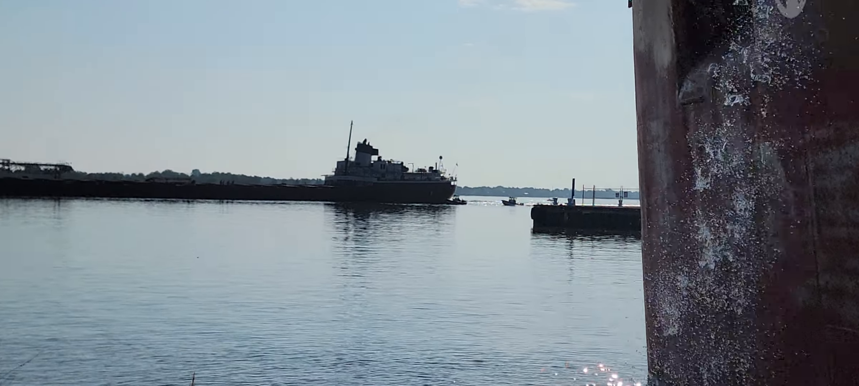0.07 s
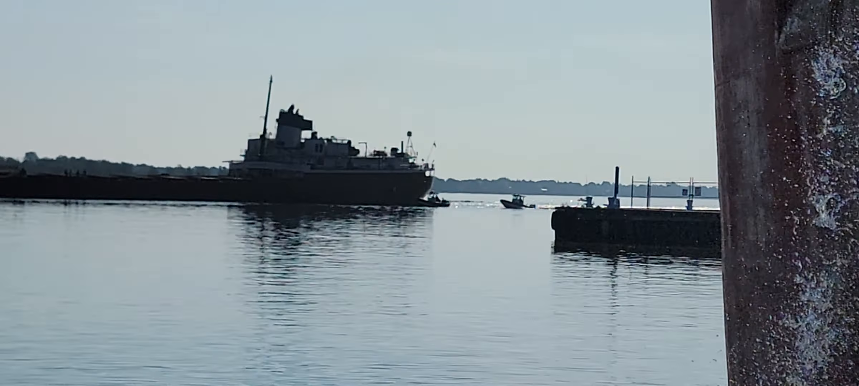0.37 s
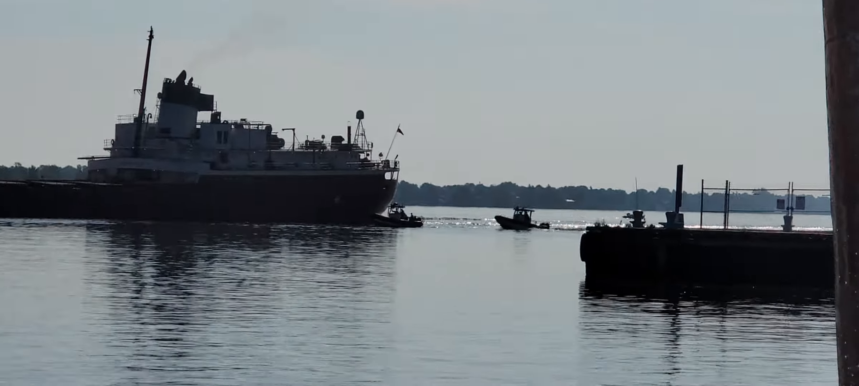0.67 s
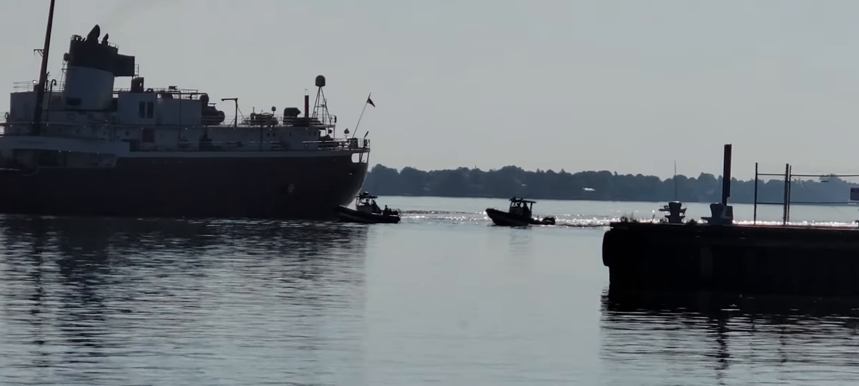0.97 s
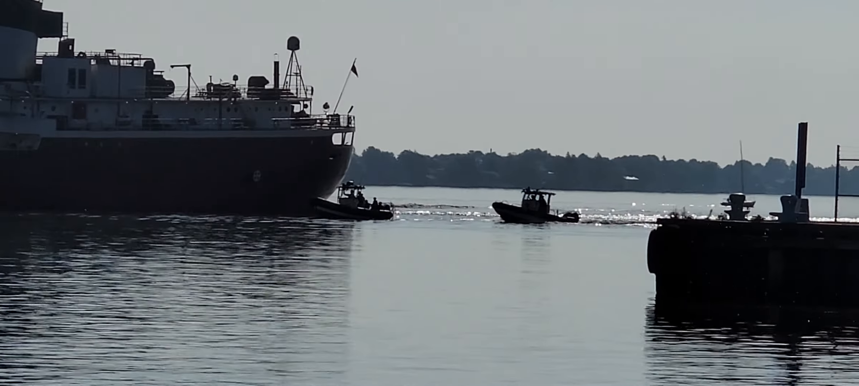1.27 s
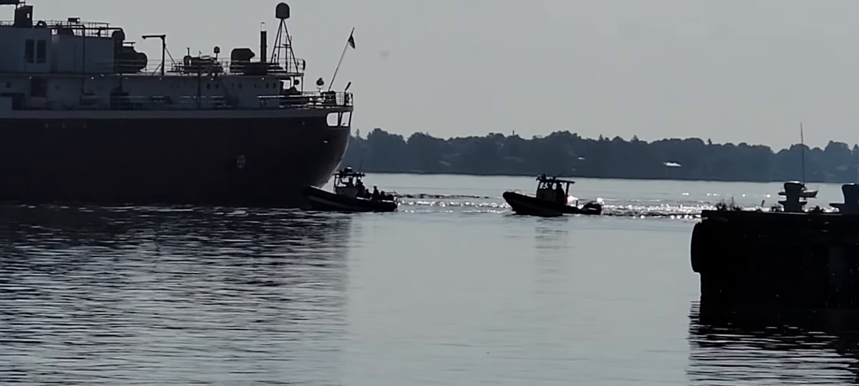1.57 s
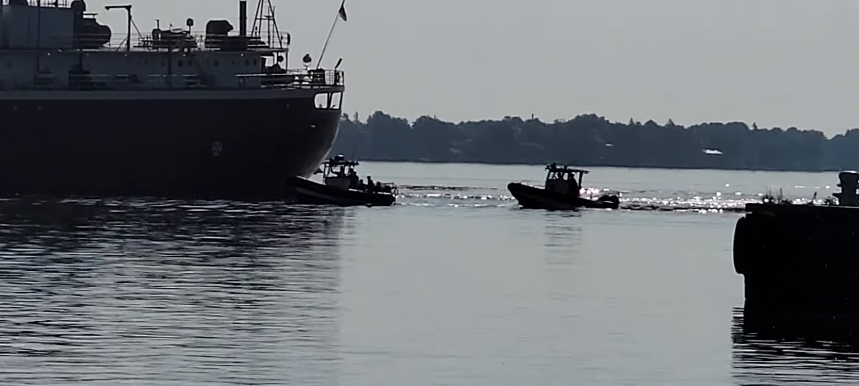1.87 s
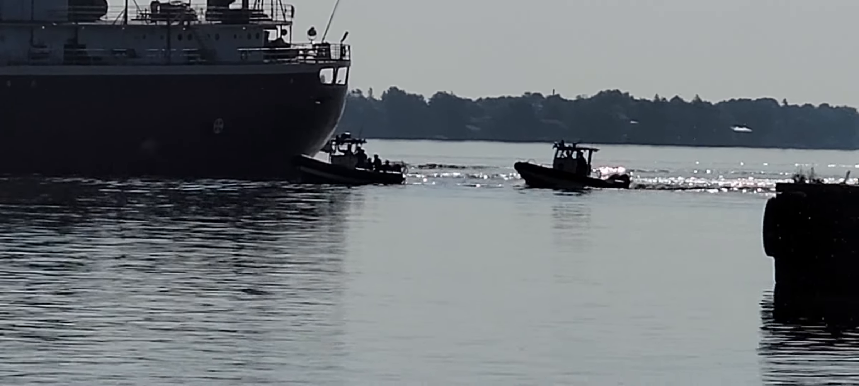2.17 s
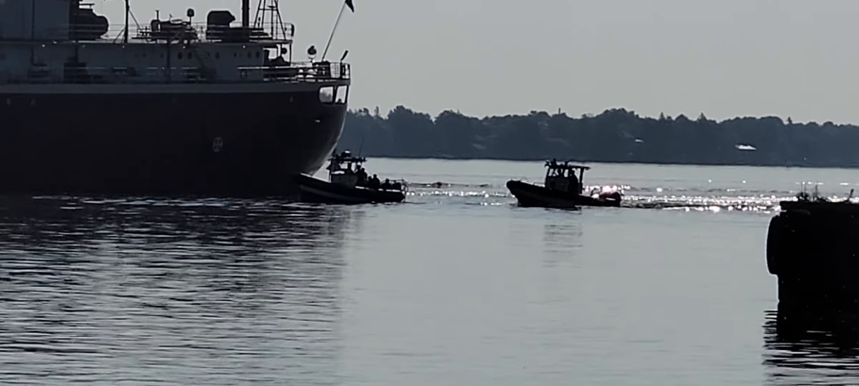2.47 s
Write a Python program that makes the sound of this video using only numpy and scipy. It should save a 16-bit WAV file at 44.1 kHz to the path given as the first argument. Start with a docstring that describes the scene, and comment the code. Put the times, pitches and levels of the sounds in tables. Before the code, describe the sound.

A distant freighter's engine drones and throbs beneath a steady wash of harbour water and a fine, surging hiss.

```python
"""A bright hiss, like fine spray, surges and flutters over the wash of churned harbour water.
Beneath it drones the diesel generator of a distant freighter: periodic firing gives a throbbing tone,
and pumps and fans add hums to a dull rumble. Water and spray are bands of noise that surge together.
The sound reaches two microphone ports a hand apart, of which the right rings in the high treble.
As the pair swings round, the hiss grows and changes colour."""
import sys
import numpy as np
from scipy import signal
from scipy.fft import rfft, irfft, next_fast_len
from scipy.io import wavfile
from scipy.ndimage import uniform_filter1d, map_coordinates

SR = 44100
rng = np.random.default_rng(int(sys.argv[2]) if len(sys.argv) > 2 else 0)


def unload_audio(sound):
    """Save the sound as a 16-bit wav file, at the path given as the first command line argument."""
    columns = np.transpose(np.atleast_2d(sound))
    # keep every value between -1 and 1, then stretch to whole-number steps
    steps = np.round(np.clip(columns, -1, 1) * 32767)
    wavfile.write(sys.argv[1], SR, steps.astype(np.int16))


N = 415422
TIME = np.arange(N) / SR


def amp(db):
    """Decibels as an amplitude ratio."""
    return 10 ** (np.asarray(db) / 20)


def unit(x):
    """Normalisation to rms 1."""
    return x / np.sqrt(np.mean(x ** 2) + 1e-20)


def along(rows, hz, column=1):
    """Interpolation of one column over log frequency."""
    table = np.transpose(rows)
    return np.interp(np.log(hz + 1), np.log(table[0] + 1), table[column])


def curve(rows, t=TIME):
    """Linear interpolation of (seconds, value) rows."""
    return np.interp(t, *np.transpose(rows))


def bell(x, centre, width):
    """A Gaussian of height 1 in time or frequency."""
    return np.exp(-((x - centre) / width) ** 2)


def wobble(rate):
    """Smooth random modulation, rate knots a second."""
    return map_coordinates(rng.standard_normal(int(N * rate / SR) + 4), [np.arange(N) * rate / SR])


def filtered(x, response):
    """Linear filtering: the spectrum times response(Hz)."""
    m = next_fast_len(N + SR // 2)
    return irfft(rfft(x, m) * response(np.fft.rfftfreq(m, 1 / SR)), m)[..., :N]


def above(hz, edge_hz, order):
    """Butterworth high-pass gain."""
    return 1 / np.sqrt(1 + (edge_hz / (hz + 1)) ** (2 * order))


def patchy(x, depth_db):
    """Random spectral modulation, in patches about 130 Hz wide and 70 ms long."""
    spectra = signal.stft(x, nperseg=1024)[2]
    field = rng.standard_normal(spectra.shape[1:])
    field = uniform_filter1d(uniform_filter1d(field, 3, axis=0), 6, axis=1)
    return signal.istft(spectra * amp(depth_db * unit(field)), nperseg=1024)[1][:, :N]


def port_noise(coherence):
    """Partial coherence: white noise at two ports, the sum and difference of independent noises."""
    def weights(hz):
        angle = np.arccos(np.clip(along(coherence, hz), 0, 1)) / 2
        return np.array([np.cos(angle), np.sin(angle)])
    mid, side = filtered(rng.standard_normal((2, N)), weights)
    return np.array([mid + side, mid - side])


# The turn of the microphones. Each row: time in seconds, share of a full swing from 0 to 1.
SWING = [(0, 0.06), (1.7, 0.14), (4.5, 0.49), (7.5, 0.86)]
def swing(t=TIME):
    """Orientation of the pair, as a share of a full swing."""
    return curve(SWING, t)


def swung(x, gain_db):
    """Time-varying filtering: the colour follows gain_db(Hz, share of the swing)."""
    hz, t, spectra = signal.stft(x, SR, nperseg=1024)
    return signal.istft(spectra * amp(gain_db(hz[:, None], swing(t))), SR, nperseg=1024)[1][..., :N]


# The path round the housing to the left port. Each row: frequency in Hz, extra phase lag in radians.
HOUSING_LAG = [(1700, -0.04), (2100, 1.8), (2450, 1.2), (2750, -1.1), (3100, -0.32), (3500, -1.2),
               (3700, -0.46), (4050, 0.43), (4450, -0.088), (5400, -1.08), (6200, -0.9), (6900, 0),
               (7500, -0.29), (9000, 0.23), (10600, 0.4), (12000, 0.88), (12700, -0.94), (15000, -0.5)]
def from_the_right(pair, base_lag_s):
    """Path difference: the left port hears later as the pair swings, and diffraction bends the phase."""
    lag = base_lag_s * SR * (1 + 0.08 * swing())
    left = map_coordinates(pair[0], [np.arange(N) - lag], order=5, mode="mirror")
    return np.array([filtered(left, lambda hz: np.exp(-1j * along(HOUSING_LAG, hz))), pair[1]])


def far_tone(hz, fade_db, drift_rad):
    """Fading: the air path makes a machine tone's level and phase wander."""
    phase = 2 * np.pi * (hz * TIME + rng.random()) + drift_rad * wobble(2.56)
    return np.sqrt(2) * np.sin(phase) * unit(amp(fade_db * wobble(3.03)))


def low_noise(response):
    """Filtered noise of long wavelength, largely coherent at the two ports."""
    coherence = [(25, 0.45), (70, 0.79), (200, 1.0), (450, 0.67)]
    return unit(filtered(port_noise(coherence), response))


# The fan's spectrum. Each row: frequency in Hz, relative density in dB.
FAN_SPECTRUM = [(230, -44), (300, -1), (330, -9.5), (352, -2), (370, -2), (385, -8.5), (430, -52)]
def fan():
    """Amplitude modulation roughens a ventilation fan's narrow noise band, which grows with the swing."""
    band = low_noise(lambda hz: amp(along(FAN_SPECTRUM, hz)))
    return amp(-49.5 + 6.5 * swing()) * band * unit(amp(2.3 * wobble(12)))


# Deep swells of the rumble. Each row: time in seconds, relative level in dB.
BOOMS = [(1.19, -32), (3.14, -31), (5.32, -31.5)]
def booms(centre_hz=40, half_width_hz=13, half_length_s=0.14):
    """Narrow-band bass noise swells under Gaussian envelopes."""
    deep = low_noise(lambda hz: bell(hz, centre_hz, half_width_hz))
    return deep * sum(amp(db) * bell(TIME, s, half_length_s) for s, db in BOOMS)


SHAFT_HZ = 15.06
# Weak exhaust tones. Each row: multiple of the shaft speed, relative level in dB.
EXHAUST_ORDERS = [(2.5, -41), (5, -43), (7, -42), (8, -40), (14, -56), (24, -56)]
# Pumps and fans on board. Each row: frequency in Hz, relative level in dB.
HUMS = [(20.4, -50), (123.8, -43), (159.4, -47.5), (237.4, -54.5), (266.9, -49.5), (299.5, -55),
        (357.4, -57.5), (561.1, -53.5), (1322.5, -52)]
# The rumble's spectrum. Each row: frequency in Hz, relative density in dB.
RUMBLE_SPECTRUM = [(15, -35), (22, -14), (40, -6.5), (75, -1.5), (115, -4.5), (140, -9), (190, -11.5),
                   (230, -14.5), (340, -18), (450, -23.5), (800, -25), (1500, -99)]
# The drone's envelope. Each row: time in seconds, relative level in dB.
DRONE_LEVEL = [(0.0, -31), (0.15, -28), (2.22, -25.5), (5.23, -27), (5.36, -25.5), (6.06, -27),
               (9.3, -26.5)]
def drone(swell_db):
    """Rotating machines give a line spectrum, here exhaust orders and hums over a continuous rumble."""
    exhaust = sum(amp(db) * far_tone(order * SHAFT_HZ, fade_db=2.5, drift_rad=0.033 * order)
                  for order, db in EXHAUST_ORDERS)
    hums = sum(amp(db) * far_tone(hz, fade_db=2.5, drift_rad=0.003 * hz) * unit(amp(2.9 * wobble(25)))
               for hz, db in HUMS)
    rumble = amp(-31.5) * low_noise(lambda hz: amp(along(RUMBLE_SPECTRUM, hz)))
    body = unit(amp(curve(DRONE_LEVEL))) * (exhaust + hums + rumble)
    near_firing = filtered(body, lambda hz: above(hz, 55, order=6) * (1 - above(hz, 150, order=6)))
    return body + near_firing * (amp(0.43 * swell_db) - 1)


# The firing tone, fading over the water. Each row: time in seconds, relative level in dB.
FIRING_LEVEL = [(0.0, -33.5), (0.6, -32), (1.3, -30), (2.2, -29.5), (2.9, -29.5), (3.6, -29.5), (4.4, -29),
                (5.0, -30), (5.65, -29.5), (6.1, -30.5), (7.1, -32), (8.1, -30), (9.3, -30.5)]
# Its octave, which comes and goes. Each row: time in seconds, relative level in dB.
OCTAVE_LEVEL = [(0.0, -50), (0.45, -42), (1.1, -52), (1.55, -40.5), (2.9, -40), (3.6, -53), (4.2, -41),
                (4.8, -44), (5.8, -52), (6.6, -39.5), (7.05, -42.5), (7.5, -39), (8.2, -51.5), (9.2, -41)]
def firing(swell_db, throb_hz=5, throb_depth_db=1.9):
    """Periodic firing, six times a shaft turn, gives a throbbing fundamental and its second harmonic."""
    hz = 6 * SHAFT_HZ
    throb_db = throb_depth_db * np.sin(2 * np.pi * throb_hz * TIME + wobble(2.51))
    envelope = amp(curve(FIRING_LEVEL) + swell_db + throb_db)
    fundamental = envelope * far_tone(hz, fade_db=0.7, drift_rad=0.07)
    octave = amp(curve(OCTAVE_LEVEL) - 0.7) * far_tone(2 * hz, fade_db=1.5, drift_rad=0.53)
    return fundamental + octave


# Swells and dips of the firing tone. Each row: time in seconds, half length in seconds, change in dB.
ENGINE_SWELLS = [(0.437, .035, -2), (0.66, .04, 3), (1.02, .09, -5), (1.62, .03, -5), (2.354, .06, 5.5),
                 (2.5, .04, -4), (2.642, 0.041, -7), (2.92, 0.037, 7), (3.41, .06, 4), (4.71, .06, -4.5),
                 (4.9, .03, -8), (5.2, .07, -3), (5.43, .08, 3), (6.5, .04, 4.5), (7.502, .04, 5),
                 (7.8, 0.066, -8), (8.8, 0.044, -5)]
def freighter():
    """Common modulation: the firing tone and the drone around it briefly swell and sink together."""
    swell_db = sum(db * bell(TIME, s, half_s) for s, half_s, db in ENGINE_SWELLS)
    return (firing(swell_db) + drone(swell_db) + fan() + booms()) * amp([[-0.35], [0.35]])


# Swells and dips of the wash. Each row: time in seconds, half length in seconds, change in dB,
# of which each layer takes a share.
SURGES = [(0.18, 0.045, -3.5), (0.507, 0.051, -4), (0.63, 0.045, 3), (0.824, 0.038, -6), (0.89, 0.027, 0.5),
          (1.06, 0.04, -6.5), (1.288, 0.04, -1), (1.48, 0.04, -2), (2.584, 0.045, 3), (2.692, 0.022, -4),
          (2.777, 0.02, 1), (2.927, 0.05, 2.5), (3.045, 0.023, 5), (3.162, 0.029, -4), (3.375, 0.021, -0.5),
          (3.483, 0.025, -1.5), (3.56, 0.034, 3), (3.793, 0.025, 3), (4.095, 0.02, -6), (4.144, 0.024, 1.5),
          (4.704, 0.04, 1), (4.871, 0.015, -2), (4.977, 0.04, -4.5), (5.516, 0.027, -4.5),
          (5.615, 0.015, -4.5), (5.954, 0.026, -2), (6.168, 0.022, -3.5), (6.621, 0.038, 0.5),
          (7.477, 0.026, -8), (8.243, 0.03, -3)]
def surge(slow_rate=9, quick_rate=29, crest_db=2.5):
    """Common modulation of water, hiss and spray, in dB; its flutter dips further than it rises."""
    swells = sum(db * bell(TIME, s, half_s) for s, half_s, db in SURGES)
    flutter = -0.22 * wobble(slow_rate) + 1.6 * wobble(quick_rate)
    return swells + np.minimum(flutter, crest_db * np.tanh(flutter / crest_db))


# The wash's spectrum. Each row: frequency in Hz, relative density in dB.
WASH_SPECTRUM = [(450, -4), (750, -6), (950, -0.5), (1200, -0.5), (1500, -3), (2150, -0.7), (2450, -6.5),
                 (2800, -10), (3300, -43), (4000, -60)]
# Its likeness at the two ports. Each row: frequency in Hz, coherence from 0 to 1.
WASH_COHERENCE = [(500, 0.75), (950, 0.82), (1230, 0), (1420, 0.66), (1750, 0), (2000, 0.17), (2180, 0.45),
                  (2500, 0.03)]
# Its envelope. Each row: time in seconds, relative level in dB.
WASH_LEVEL = [(0.0, -38), (0.55, -33), (1.1, -34), (1.7, -33), (2.4, -34), (3.05, -32.5), (3.6, -33.5),
              (6.0, -33), (7.5, -34.5), (9.3, -34)]
def wash(surge_db):
    """Distant churned water radiates restless midrange noise with one broad resonance."""
    colour_db = lambda hz: along(WASH_SPECTRUM, hz) + 5.5 * bell(hz, 1498, 130)
    pair = filtered(port_noise(WASH_COHERENCE), lambda hz: amp(colour_db(hz)) * above(hz, 462, order=4))
    water = patchy(from_the_right(pair, base_lag_s=0.00024), depth_db=2.0)
    lapping_db = 0.57 * wobble(24)
    return unit(water) * amp(curve(WASH_LEVEL) + 0.49 * surge_db + lapping_db + 4.0)


# Splashes by the dock. Each row: time in seconds, level in dB, centre in Hz, half length in seconds.
SPLASHES = [(2.755, -27, 1850, 0.024), (7.567, -24, 2500, 0.012)]
def splashes():
    """Each soft slap of water is a transient: a short swell of noise in one broad band."""
    out = np.zeros((2, N))
    for s, db, centre_hz, half_s in SPLASHES:
        band = unit(filtered(rng.standard_normal((2, N)), lambda hz: bell(hz, centre_hz, 700)))
        out += amp(db) * band * bell(TIME, s, half_s)
    return out


# Sharp ticks in the hiss. Each row: start in seconds, relative level in dB.
TICKS = [(1.007, 1), (1.018, -6), (3.539, -9)]
def ticks(t60_s=0.0037):
    """Rapid exponential decay turns high-passed noise into single bright snaps."""
    t = np.arange(SR // 100) / SR
    snaps = np.zeros(N)
    for s, db in TICKS:
        snaps[round(s * SR):][:len(t)] += amp(db - 60 * t / t60_s) * rng.standard_normal(len(t))
    return filtered(snaps, lambda hz: above(hz, 11000, order=7)) * amp([[-7], [0]])


# Hollows in the hiss. Each row: centre in Hz at no swing and at full swing, half width in Hz, gain in dB.
HOLLOWS = [(7930, 6700, 260, -3.5), (9900, 9160, 260, -3.5)]
def hollowed(pair):
    """Phasing: notches in the sound common to both ports glide down as the pair swings."""
    def notches_db(hz, share):
        return sum(db * bell(hz, start + share * (end - start), width)
                   for start, end, width, db in HOLLOWS)
    mid = swung((pair[0] + pair[1]) / 2, notches_db)
    side = (pair[0] - pair[1]) / 2
    return np.array([mid + side, mid - side])


# The spray's growth. Each row: time in seconds, relative level in dB.
SPRAY_LEVEL = [(0.0, -30.5), (0.55, -24.5), (1.15, -25), (1.5, -23), (2.3, -23), (3.4, -23.5), (4.7, -21.5),
               (7.1, -21.5), (9.3, -22)]
def spray_level_db():
    """The slow envelope of the spray, which its hiss partly follows."""
    return curve(SPRAY_LEVEL)


# The hiss's spectrum. Each row: frequency in Hz, relative density in dB at no swing and at full swing.
HISS_SPECTRUM = [(2420, -12.5, -10), (2810, -5, -12.5), (3090, 3.5, 0), (3430, 2, -1.5), (3540, -1, -11),
                 (3720, 0, 0), (4500, 0.5, -2.5), (4840, -1, 2.5), (5200, 3.5, 3), (5760, -3, -5),
                 (6260, -1.5, -2.5), (7000, -1.5, -3.5), (7200, 0.5, 1), (8470, -3, -5.5), (9600, -5, -9),
                 (11200, -5, -22), (13000, -38, -40)]
# Its likeness at the two ports. Each row: frequency in Hz, coherence from 0 to 1.
HISS_COHERENCE = [(2880, 0.45), (3100, 0.52), (3400, 0.7), (3620, 0.05), (4100, 1), (4550, 0.94),
                  (4800, 0.34), (5300, 0.77), (5550, 0.45), (6050, 0.5), (6700, 0.25), (7100, 0.48),
                  (7900, 0.45), (9000, 0.65), (9600, 0.68)]
def hiss(surge_db):
    """Broadband noise forms the steadier body of the spray, with a notch at the right port."""
    def colour_db(hz, share):
        return (1 - share) * along(HISS_SPECTRUM, hz, 1) + share * along(HISS_SPECTRUM, hz, 2)
    pair = filtered(swung(port_noise(HISS_COHERENCE), colour_db), lambda hz: above(hz, 1670, order=6))
    left, right = unit(patchy(from_the_right(pair, base_lag_s=0.0003392), depth_db=2.16))
    right = filtered(right, lambda hz: amp(-9 * bell(hz, 8180, 590)))
    growth_db = spray_level_db() - np.mean(spray_level_db())
    flutter_db = 0.35 * wobble(30)
    return np.array([left, right]) * amp(-24.5 + 0.61 * growth_db + 0.33 * surge_db + flutter_db)


BAND_LIMIT_HZ = 15800
# Port responses to the spray. Each row: frequency in Hz, then relative gain in dB at the left port,
# at the right with no swing, and at the right with full swing.
PORT_RESPONSE = [(9470, -16, -27, -30), (10340, -12.5, -9.5, -2.5), (10700, -17.5, -17, -5.5),
                 (12140, -15, -1.5, -6.5), (12240, -11, 0.5, 0), (13300, -10, 2, -1.5),
                 (14300, -13, -4.5, 4), (15240, -12, -6, -4), (15600, -17, -1, -11)]
def spray(surge_db, large_drops_per_s=40):
    """Countless droplets, a few larger, sum incoherently to a fizz that each port's response colours."""
    def port(x, column):
        band = lambda hz: above(hz, 8850, order=16) * (hz < BAND_LIMIT_HZ)
        return filtered(x, lambda hz: amp(along(PORT_RESPONSE, hz, column)) * band(hz))
    grain = amp(1.1 * wobble(900) + 0.55 * wobble(22))
    large_drops = (rng.random(N) < large_drops_per_s / SR) * rng.uniform(-1, 1, N) * amp(9)
    coherence = [(10000, 0.39), (12500, 0.22), (13100, 0.44), (14100, 0.45), (14900, 0.2)]
    pair = from_the_right(grain * port_noise(coherence) + large_drops, base_lag_s=0.000343)
    share = swing()
    left = port(pair[0], column=1) * amp(-1.2 * (1.5 - share))
    right = (1 - share) * port(pair[1], column=2) + share * port(pair[1], column=3)
    return amp(spray_level_db() + 0.85 * surge_db + 3.5) * unit(np.array([left, right]))


def scene():
    """Superposition: everything arrives over open water and adds together."""
    surge_db = surge()
    background = freighter() + wash(surge_db) + splashes()
    return background + hollowed(hiss(surge_db) + spray(surge_db)) + ticks()


def record(dry, ceiling=0.88):
    """Soft saturation rounds the highest peaks, and a low-pass removes all above the band limit."""
    rounded = dry / (1 + (dry / ceiling) ** 10) ** (1 / 10)
    return filtered(rounded, lambda hz: hz < BAND_LIMIT_HZ)


dry = scene()
out = record(dry)
unload_audio(out)
```